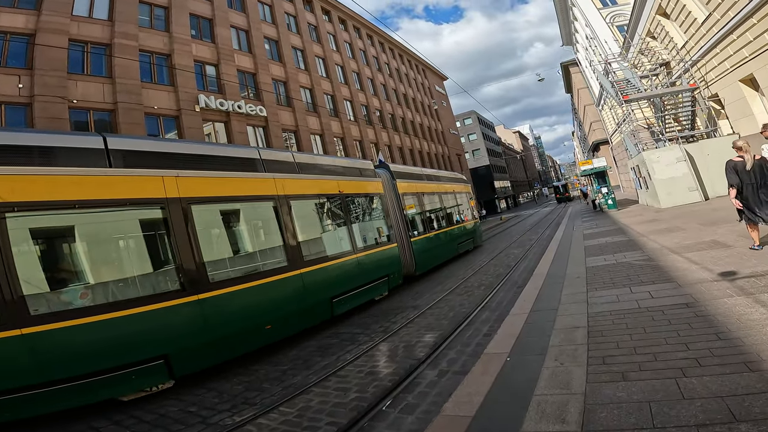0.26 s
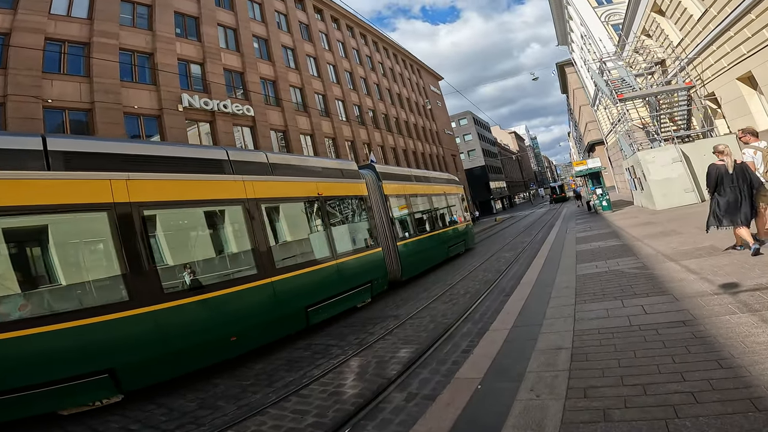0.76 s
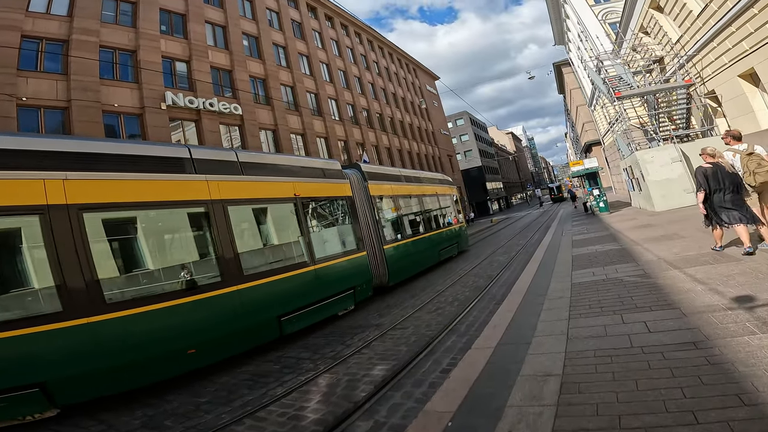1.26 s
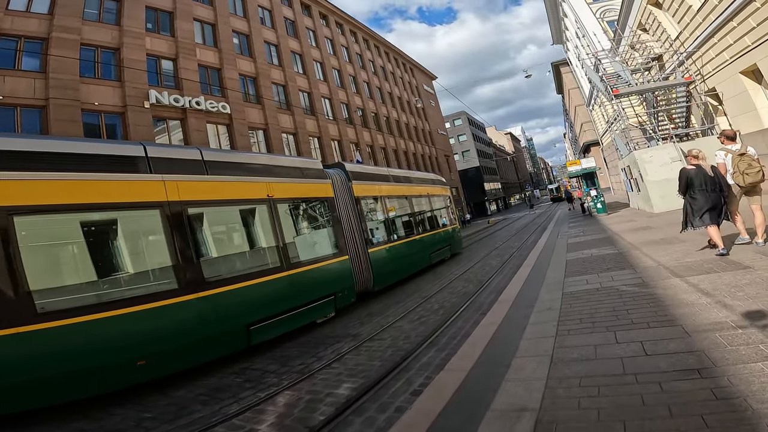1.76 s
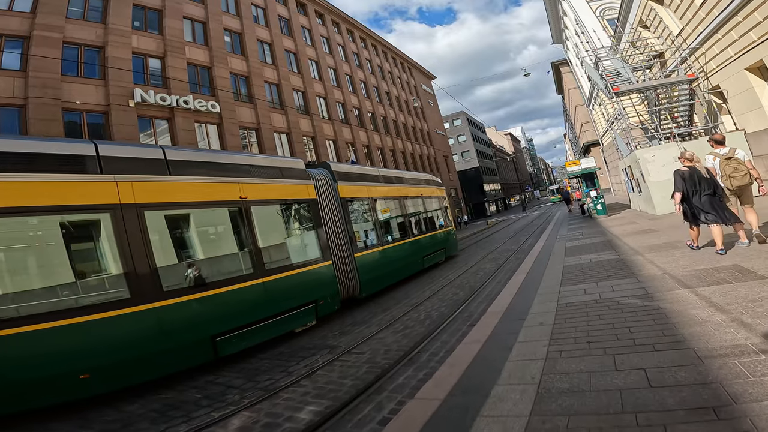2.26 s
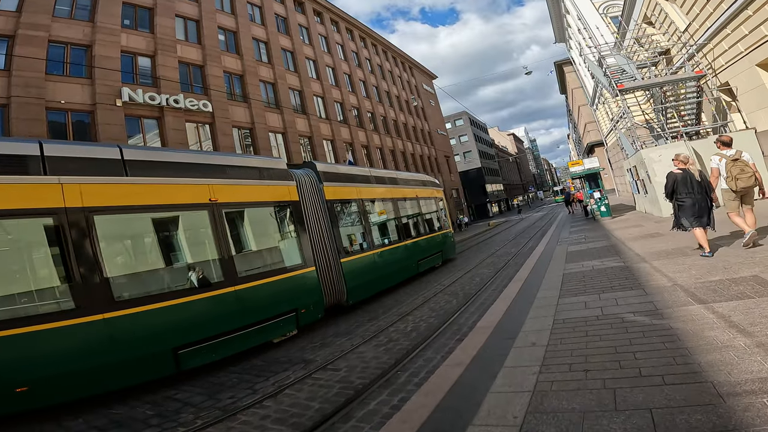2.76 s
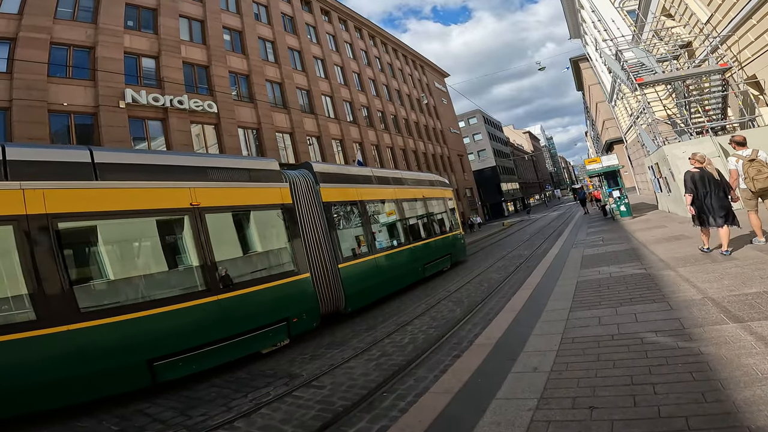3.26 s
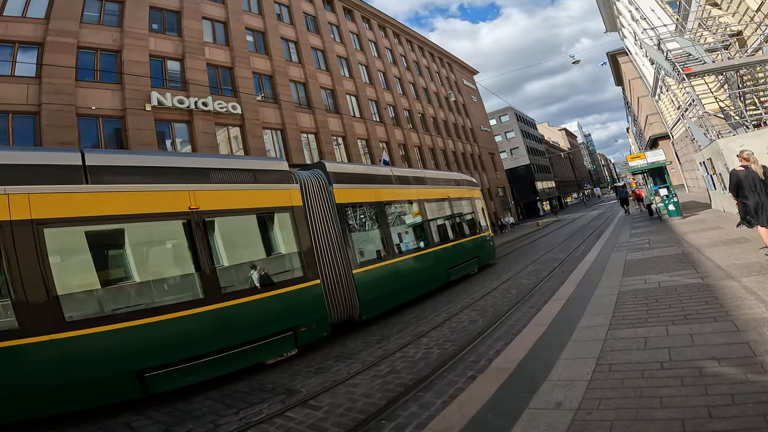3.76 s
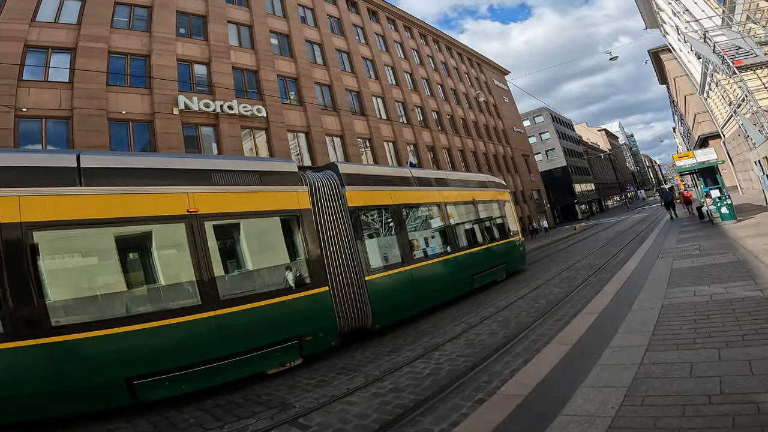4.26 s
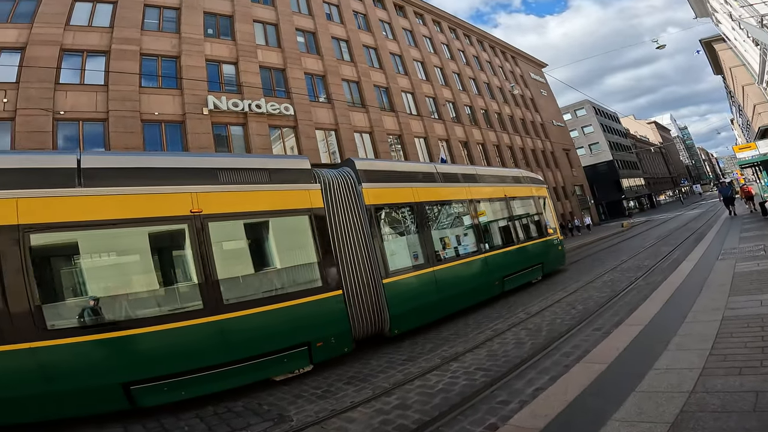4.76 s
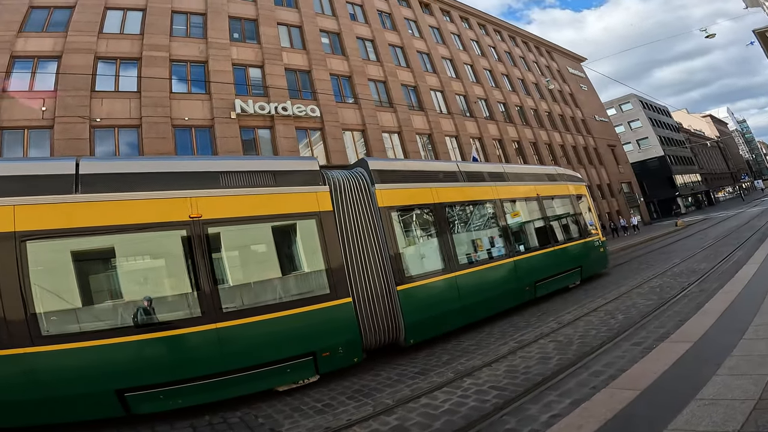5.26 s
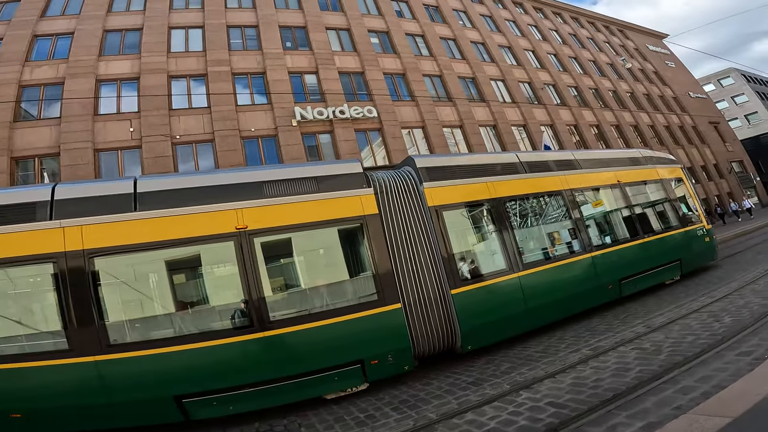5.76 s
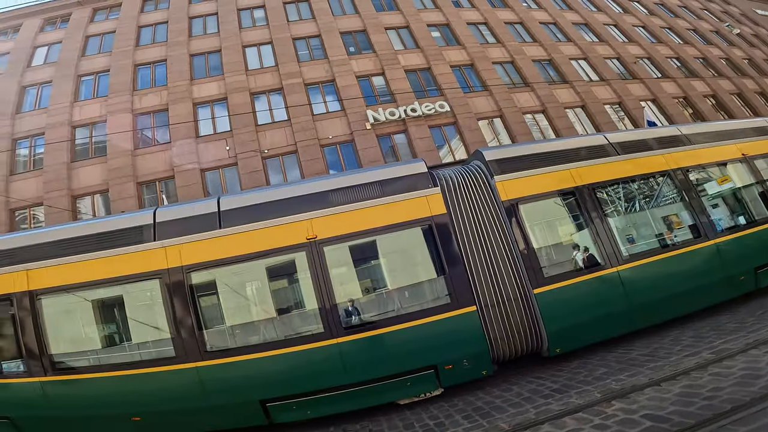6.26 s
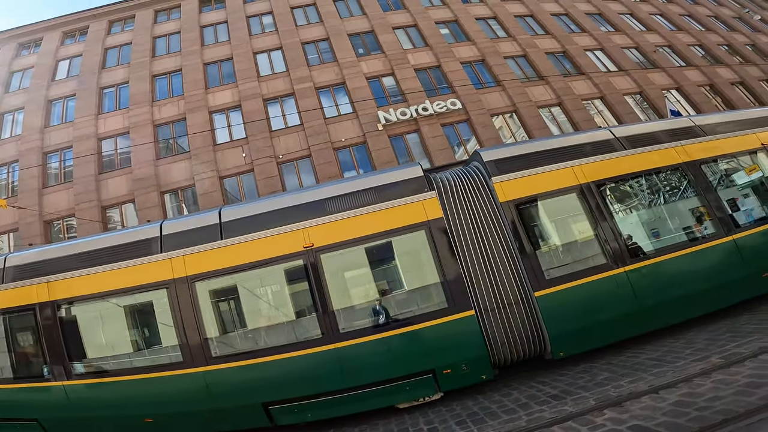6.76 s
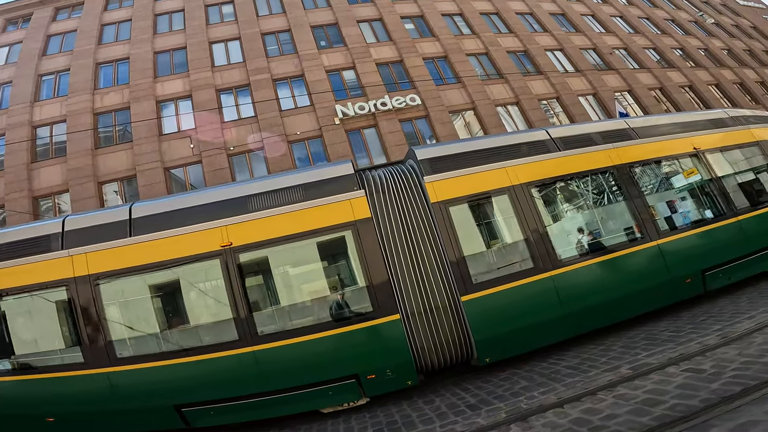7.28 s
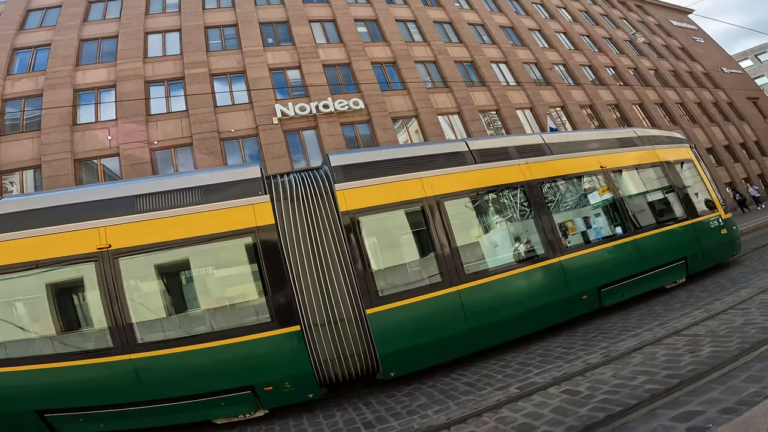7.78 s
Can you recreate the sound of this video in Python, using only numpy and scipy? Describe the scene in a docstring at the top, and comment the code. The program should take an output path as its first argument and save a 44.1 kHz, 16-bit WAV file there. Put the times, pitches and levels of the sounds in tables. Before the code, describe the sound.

Outdoors on a city street, suitcase wheels roll continuously over rough stone, close and dominant. Dull woody knocks come thickly at first, thin out after about six seconds, then return with a sharp burst of handle clacks just past seven. The hollow boom gradually deepens as the pace eases. Light rattling, tiny squeaks and soft stride swishes sit on top; low traffic and a faint high tram whine stay behind, nearly mono.

```python
"""A wheeled suitcase is pulled over brick and cobble paving in a city street, close to a nearly mono microphone.
Filtered random bumps make its hollow boom and rolling rumble; dying tones and noise bursts make the wheel knocks.
Its handle clacks in noise bursts, its fittings rattle, grit snaps and rubbing parts squeak as wavering tones.
Swelling friction noise gives a soft swish at each stride. A tram whines in faint tones over street noise."""
import sys
import numpy as np
from scipy import signal
from scipy.fft import rfft, irfft, next_fast_len
from scipy.io import wavfile

SR = 44100
rng = np.random.default_rng(int(sys.argv[2]) if len(sys.argv) > 2 else 0)


def digitize_waveform(pressure):
    """Quantize a signal to 16-bit integers and store it at the path in sys.argv[1].

    Rows of a 2-D input are taken as channels; values are limited to [-1, 1].
    """
    field = np.atleast_2d(pressure).T
    bounded = np.clip(field, -1, 1)
    quanta = np.round(bounded * 32767).astype(np.int16)
    wavfile.write(sys.argv[1], SR, quanta)


N = 353682
TIME = np.arange(N) / SR  # seconds
HIT_TIME = np.arange(SR // 10) / SR  # the 0.1 s that one hit may last


def undb(db):
    """Turn decibels into gain."""
    return np.exp(np.asarray(db) * (np.log(10) / 20))


def unit(x):
    """Scale to an average (rms) level of 1."""
    return x / np.sqrt(np.mean(x ** 2))


def add(out, start_s, sound):
    """Mix in a short sound from start_s on."""
    first = max(int(start_s * SR), 0)
    out[first:first + len(sound)] += sound[:max(N - first, 0)]


def follow(table):
    """Join the (time_s, value) rows of a table by straight lines."""
    return np.interp(TIME, *np.transpose(table))


def colour(x, points, size=8192):
    """Filter through (pitch_hz, level_db) points without any sound ahead of its cause."""
    hz, db = np.transpose(points)
    bins_hz = np.maximum(np.arange(size // 2 + 1) * SR / size, 1)
    gain = undb(np.interp(np.log(bins_hz), np.log(hz), db))
    # folding the cepstrum of the log gain forward gives the most prompt response
    cepstrum = irfft(np.log(gain))
    cepstrum[1:size // 2] *= 2
    cepstrum[size // 2 + 1:] = 0
    response = irfft(np.exp(rfft(cepstrum)))[:size // 2]
    return signal.oaconvolve(x, response)[:len(x)]


def resonate(x, hz, width_hz):
    """Pass x through one resonance, with gain 1 at its centre."""
    return signal.lfilter(*signal.iirpeak(hz, hz / width_hz, fs=SR), x)


def walk(rate):
    """Wander through random levels, rate of them a second, joined by lines; rms 1."""
    levels = rng.standard_normal(16384)
    return unit(np.interp(TIME * rate, np.arange(len(levels)), levels))


def bumps(rate, spread_db):
    """Make about rate impulses a second at random moments, of random sign and size."""
    hit = np.flatnonzero(rng.random(N) < rate / SR)
    chance = rng.random(N)[hit]
    sign = (-1) ** hit  # odd or even sample
    out = np.zeros(N)
    out[hit] = sign * undb(spread_db * np.sqrt(12) * chance)  # sqrt(12): spread is a standard deviation
    return unit(out)


def swell(length_s):
    """A rounded rise and fall, twice length_s from end to end."""
    return np.exp(-np.linspace(-2, 2, int(2 * length_s * SR)) ** 2)


def ring(hz, decay_s):
    """One struck mode: a tone that dies away exponentially."""
    return np.exp(-HIT_TIME / decay_s) * np.sin(2 * np.pi * hz * HIT_TIME)


def spray(spectrum, rise_s, decay_s, tail_db, tail_s):
    """A hit as quickly dying noise, many tiny contacts with a weak tail; always of the same energy."""
    fade = np.exp(-HIT_TIME / decay_s) + undb(tail_db) * np.exp(-HIT_TIME / tail_s)
    rise = 1 - np.exp(-HIT_TIME / rise_s)
    burst = colour(rng.standard_normal(len(HIT_TIME)) * fade * rise, spectrum)
    return unit(burst) / 12  # peak near 1


# colour of the street noise: pitch_hz [Hz], relative level_db [dB per Hz]
STREET_COLOUR = [(25, -6), (75, 7.5), (125, 11), (200, 4), (700, -5), (1500, -12.5), (3000, -20.5),
                 (5000, -28.5), (6000, -26.5), (7400, -27.5), (8400, -38.5), (10000, -29), (11800, -39.5),
                 (13200, -41), (14500, -59.5)]


def street(level_db, swell_db):
    """Traffic and tram noise between the house fronts: coloured noise, slowly swelling."""
    noise = unit(colour(rng.standard_normal(N), STREET_COLOUR))
    return undb(level_db + swell_db * walk(1.976)) * noise


# how loud the street's deep rumble is: time_s [s], level_db [dB rms]
DEEP_RUMBLE_LEVEL = [(0, -37), (1.15, -36.5), (1.4, -49), (2.2, -51), (2.45, -39), (3.6, -37.5), (4.2, -48),
                     (4.8, -37), (5.8, -50), (6.4, -41.5), (7.0, -57.5), (7.8, -37)]


def deep_rumble(centre_hz, width_hz):
    """The low rumble of tram and traffic: narrow low noise that comes and goes."""
    noise = rng.standard_normal(N)
    for _ in range(2):
        noise = resonate(noise, centre_hz, width_hz)
    return undb(follow(DEEP_RUMBLE_LEVEL)) * unit(noise)


# the tram's electric whine: pitch_hz [Hz], level_db at the start [dB rms before the waver],
# fade_s, by which it has faded 20 dB [s]
WHINE_TONES = [(2955, -62.5, 5), (5908, -73, 6), (6022, -69, 5), (9038, -74, 1.2), (12049, -75, 1)]


def tram_whine(waver_db):
    """Thin, slightly unsteady tones from the drive, fading as the tram rolls on."""
    drift = np.cumsum(1 + 0.0006 * walk(40)) / SR
    waver = waver_db * walk(12)
    out = np.zeros(N)
    for hz, db, fade_s in WHINE_TONES:
        level = np.sqrt(2) * undb(db - 20 * TIME / fade_s + waver)
        out += level * np.sin(2 * np.pi * hz * drift)
    return out


# a swish with each stride: middle_s [s], length_s [s], level_db [dB]
STRIDES = [(.57, 0.207, -60), (1.135, 0.09, -53), (1.74, 0.11, -56.5), (2.401, 0.152, -53.5),
           (2.955, 0.157, -56), (3.536, 0.111, -53.5), (4.16, 0.13, -58.5)]
# colour of cloth and soles brushing: pitch_hz [Hz], relative level_db [dB per Hz]
SWISH_COLOUR = [(1500, -2), (4000, 3.5), (5200, -3.5), (7000, 3.5), (8500, -11.5), (10000, -1.5),
                (11500, -6.5), (13000, -4), (15500, -20)]


def strides():
    """Cloth and soles brush once a step: friction grains that swell, catch and fade over a faint steady brush."""
    brushing = np.zeros(N)
    for middle_s, length_s, db in STRIDES:
        add(brushing, middle_s - length_s, undb(db) * swell(length_s))
    catching = undb(2.93 * walk(70))
    grains = colour(bumps(3500, 3.8), SWISH_COLOUR)
    return (brushing + undb(-66.5)) * unit(catching * grains)


# rubbing parts squeak faintly: middle_s [s], length_s [s], relative level_db [dB], pitch_hz [Hz]
SQUEAKS = [(1.15, 0.039, -55, 6950), (1.70, .04, -56, 7000), (2.84, 0.06, -52, 3730),
           (3.16, .05, -52.5, 3740), (3.54, .08, -55.5, 6850), (4.66, .06, -53.5, 3750),
           (5.15, 0.1, -54.5, 3800), (5.44, 0.095, -55, 3750)]


def squeaks(waver, flutter_db):
    """A contact sticks and slips: a thin tone whose pitch wavers and whose level flutters."""
    out = np.zeros(N)
    bend = 1 + waver * walk(1100)
    flutter = unit(undb(flutter_db * walk(90)))
    for middle_s, length_s, db, hz in SQUEAKS:
        shape = np.zeros(N)
        add(shape, middle_s - length_s, swell(length_s))
        out += undb(db) * shape * flutter * np.sin(2 * np.pi * hz * np.cumsum(bend) / SR)
    return out


# grit snaps under a wheel: start_s [s], rough peak level_db [dB]
SNAPS = [(4.4126, -24), (7.234, -28)]
# colour of snapping grit: pitch_hz [Hz], relative level_db [dB per Hz]
GRIT_COLOUR = [(1000, -4), (2000, 0), (4000, -9), (6500, -3), (8700, -1), (11300, -7), (13000, 1.5),
               (14300, -12)]


def snaps(crumbs_db, crumbs_s):
    """Grit cracks away from under a wheel in a noise burst, and its crumbs scatter as dying ticks."""
    out, scatter = np.zeros(N), np.zeros(N)
    for start_s, db in SNAPS:
        crack = spray(GRIT_COLOUR, rise_s=0.0014, decay_s=0.0013, tail_db=-30, tail_s=0.018)
        add(out, start_s, undb(db) * crack)
        add(scatter, start_s, undb(db + crumbs_db) * np.exp(-HIT_TIME / crumbs_s))
    return out + scatter * unit(colour(bumps(900, 4), GRIT_COLOUR))


# the handle clacks in its tubes: start_s [s], relative level_db [dB], pitch_hz of the ringing [Hz]
CLACKS = [(1.0384, -30.5, 3000), (1.646, -29, 2900), (2.071, -34, 2330), (2.459, -33, 2000),
          (2.762, -32, 3450), (2.8943, -31.5, 2900), (2.959, -33, 2070), (2.9806, -28.5, 3000),
          (3.0355, -32, 3700), (3.168, -33, 3700), (3.8172, -31, 3360), (3.8496, -31, 3200),
          (3.901, -33, 3150), (4.19, -32, 2980), (4.6214, -34, 3650), (4.8801, -29.5, 3700),
          (5.0234, -31.5, 3660), (5.189, -30.5, 3790), (5.2116, -30.5, 3840), (5.249, -37, 2000),
          (5.271, -36, 2030), (5.543, -36, 1980), (6.968, -33, 2000), (6.995, -34.5, 2090),
          (7.0335, -37, 1650), (7.0465, -35.5, 2010), (7.1606, -34, 1920), (7.1832, -28.5, 1960),
          (7.2055, -36, 2100), (7.2904, -23.5, 1970), (7.3121, -26, 2040), (7.347, -31.5, 2050),
          (7.380, -37, 1920), (7.733, -32, 3760), (7.8865, -31, 3234), (7.9084, -32, 3066)]
# colour of the handle's crack: pitch_hz [Hz], relative level_db [dB per Hz]
HANDLE_COLOUR = [(400, -10), (1200, 1.5), (2000, 1), (2600, -3.5), (3600, -1.5), (4800, -13.5),
                 (8000, -26.5), (16000, -46)]


def clacks(ring_db, ring_s, bounce_s, bounce_db):
    """The loose handle hits its tubes and bounces once; the tubes ring briefly."""
    out = np.zeros(N)
    for start_s, db, hz in CLACKS:
        bounce = (bounce_s * (.5 + rng.random()), bounce_db)
        for late_s, drop_db in ((0, 0), bounce):
            crack = spray(HANDLE_COLOUR, rise_s=0.0013, decay_s=0.0023, tail_db=-19, tail_s=.018)
            tube = np.e * HIT_TIME / ring_s * ring(hz, ring_s)
            add(out, start_s + late_s, undb(db + drop_db) * (crack + undb(ring_db) * tube))
    return out


# colour of the loose fittings: pitch_hz [Hz], relative level_db [dB per Hz]
FITTINGS_COLOUR = [(500, -11), (1200, 2), (1700, -2), (2100, 0.5), (2500, -4), (3000, -2), (3400, -7.5),
                   (3750, -4), (4200, -12), (5200, -13.5), (7000, -17.5), (12000, -30), (15000, -49.5)]


def ticks(rate, spread_db):
    """Loose fittings tap one at a time: small dry ticks from filtered impulses."""
    return unit(colour(bumps(rate, spread_db), FITTINGS_COLOUR))


# colour of the rolling wheels: pitch_hz [Hz], relative level_db [dB per Hz]
WHEELS_COLOUR = [(30, -23.5), (75, -6), (135, 0), (200, -6), (290, -4.5), (380, 2), (420, -2.5), (570, 0),
                 (700, -1.5), (900, -11), (1300, -19.5), (2200, -31), (5000, -51.5), (16000, -85.5)]


def rolling(rate, spread_db, texture_db, chatter_s, scrape_db):
    """Stone edges jolt the wheels over a fine rough texture; each jolt sets the fittings chattering."""
    jolts = bumps(rate, spread_db)
    texture = undb(texture_db) * bumps(2500, 2.8)
    rumble = colour(jolts + texture, WHEELS_COLOUR)
    # each jolt leaves a shaking that dies away over chatter_s
    shaking = unit(signal.lfilter([1], [1, -np.exp(-1 / (chatter_s * SR))], np.abs(jolts)))
    chatter = (shaking + undb(scrape_db)) * rng.standard_normal(N)
    rattle = colour(chatter, FITTINGS_COLOUR)
    return unit(rumble), unit(rattle)


# how coarse the paving is under the wheels: time_s [s], level_db [dB]
PAVING = [(0, -0.5), (.4, -2), (.55, .5), (1.2, 0), (2.2, 0.5), (3.0, 2), (3.9, 0), (4.55, -2.5), (4.75, 0),
          (5.9, 1), (6.85, -4.5), (7.2, -1.5), (8.0, -2)]
# the wheels cross a patch of uneven stones: middle_s [s], extra shaking level_db [dB]
PATCHES = [(.48, 3.5), (.73, 1.5), (1.75, 3.5), (3.87, 3.5), (4.14, 5.5), (4.39, 4.5), (4.68, 5),
           (4.79, 3.5), (4.92, 1.5), (7.26, 4), (7.88, 3.5)]


def shaking_db(s):
    """How hard the ground shakes wheels and fittings at time s: the paving plus its uneven patches."""
    patch_s = 0.041  # from the middle of a patch to its edge
    level_db = np.interp(s, *np.transpose(PAVING))
    for middle_s, db in PATCHES:
        level_db = level_db + db * np.exp(-((s - middle_s) / patch_s) ** 2)
    return level_db


# a wheel drops into a paving joint; small sharp edges give the high pitches:
# start_s [s], relative level_db [dB], pitch_hz [Hz]
KNOCKS = [(0.153, -18, 567), (0.302, -17.5, 494), (0.359, -18.5, 527), (0.585, -13.5, 570),
          (0.658, -27.5, 1040), (0.724, -24.5, 930), (0.736, -16.5, 541), (0.846, -16, 556),
          (0.981, -14, 617), (1.113, -13, 533), (1.251, -16.5, 591), (1.352, -18.5, 652), (1.397, -17, 550),
          (1.525, -21, 516), (1.539, -20, 560), (1.568, -21, 560), (1.837, -20.5, 527), (2.07, -22, 640),
          (2.141, -20, 624), (2.34, -28, 1080), (2.381, -17.5, 573), (2.463, -18, 549), (2.514, -23, 568),
          (2.679, -21, 592), (2.79, -21, 600), (2.817, -27, 1050), (2.854, -23, 673), (2.927, -18.5, 594),
          (2.958, -17.5, 525), (3.005, -20, 627), (3.04, -19.5, 574), (3.065, -23, 750), (3.169, -27, 1090),
          (3.196, -20, 670), (3.311, -22, 560), (3.334, -19.5, 547), (3.469, -18.5, 531), (3.501, -21, 554),
          (3.6, -19, 563), (3.683, -15.5, 538), (3.733, -14, 549), (3.866, -16, 530), (3.98, -18.5, 657),
          (4.123, -22, 557), (4.36, -17, 560), (4.394, -26, 1074), (4.671, -19, 587), (4.686, -19.5, 600),
          (4.783, -26.5, 1170), (4.914, -26, 1000), (5.064, -19, 560), (5.195, -19.5, 457),
          (5.216, -13, 550), (5.366, -20.5, 736), (5.543, -23, 620), (5.651, -18, 650), (5.783, -19, 732),
          (5.929, -17, 506), (5.931, -28.5, 1144), (6.09, -15, 564), (6.426, -21, 560), (7.291, -21, 666),
          (7.427, -21, 571), (7.431, -29.5, 1020), (7.607, -17, 580), (7.702, -17.5, 472),
          (7.811, -22.5, 655.5), (7.862, -20.5, 565), (7.94, -16, 570)]
# colour of the axle's dull crack: pitch_hz [Hz], relative level_db [dB per Hz]
AXLE_COLOUR = [(300, -13.5), (900, 2.5), (1400, -5), (3000, -22), (7000, -38.5), (16000, -67)]


def knocks(rise_cycles, uneven_db, overtone, overtone_db, thud_hz, thud_s, thud_db, crack_db):
    """A wheel hits a joint's far edge, no two alike: a tone and woody overtone swell and die, with thud and crack."""
    out = np.zeros(N)
    for start_s, db, hz in KNOCKS:
        length, hardness = undb(uneven_db * rng.standard_normal(2))
        rise_s = length * rise_cycles / hz
        modes = ring(hz, rise_s) + hardness * undb(overtone_db) * ring(overtone * hz, rise_s)
        knock = np.e * HIT_TIME / rise_s * modes
        thud = undb(thud_db) * ring(thud_hz, thud_s)  # the hollow case
        crack = spray(AXLE_COLOUR, rise_s=0.00124, decay_s=0.0042, tail_db=-17.5, tail_s=0.0125)
        add(out, start_s, undb(db) * (knock + thud + hardness * undb(crack_db) * crack))
    return out


# the quicker the pace, the higher the band that the stones shake: time_s [s], pitch_hz [Hz]
PACE = [(0, 286), (1.2, 282), (2.1, 238), (2.9, 245.8), (3.6, 224), (4.8, 224), (5.8, 208.3), (6.6, 190),
        (8, 182)]
# resonances of the hollow case: pitch_hz [Hz], width_hz [Hz], relative level_db [dB]
CASE_MODES = [(135.6, 38.2, -0.5), (171.5, 21.3, 3), (194.7, 23.8, 2.5), (227.5, 29.75, -1),
              (268.2, 47, -.5), (315.7, 50.4, -2.5), (372.5, 35.6, -1.5)]


def case_boom(rate, spread_db, focus_db):
    """The stones shake the hollow case; the modes nearest to the pace take most of the energy."""
    pace_hz = follow(PACE)
    shake, out, power = bumps(rate, spread_db), 0, 0
    for k, (hz, width_hz, db) in enumerate(CASE_MODES):
        # each panel is shaken at its own moments
        panel_shake = np.roll(shake, k * SR)
        mode = resonate(resonate(panel_shake, hz, width_hz), hz, 3 * width_hz)
        gain = undb(db - focus_db * np.log2(hz / pace_hz) ** 2)
        out = out + gain * mode
        power = power + gain ** 2 * width_hz
    return unit(out / np.sqrt(power))  # the changing pace moves the pitch, hardly the level


def suitcase():
    """The hollow case booms, the wheels rumble and knock, and its loose parts rattle, clack and squeak."""
    rumble, rattle = rolling(rate=140, spread_db=2.3, texture_db=-2.2, chatter_s=0.006, scrape_db=-1.0)
    # the rumble gains 3 dB for each octave that the pace band lies above 229 Hz
    pace_db = 3 * np.log2(follow(PACE) / 229)
    shaken = undb(-31.5 + pace_db) * rumble + undb(-51) * rattle
    shaken += undb(-56) * ticks(rate=70, spread_db=2.0)
    out = undb(-25) * case_boom(rate=600, spread_db=2, focus_db=16.5)
    out += undb(shaking_db(TIME)) * shaken
    out += undb(0.64) * knocks(rise_cycles=1.0, uneven_db=1.2, overtone=1.65, overtone_db=-17,
                               thud_hz=257.6, thud_s=0.0069, thud_db=-12.0, crack_db=-14)
    out += undb(-.5) * clacks(ring_db=-11, ring_s=.002, bounce_s=.007, bounce_db=-11)
    out += snaps(crumbs_db=-26, crumbs_s=0.015)
    out += undb(-1) * squeaks(waver=.035, flutter_db=6.5)
    return out


# the two microphone ports differ in colour: pitch_hz [Hz], left minus right level_db [dB]
PORTS = [(60, 0.75), (500, 0.61), (1300, 0), (7000, 0), (10500, .5), (13000, 9.5), (15500, 9.5)]


def ports(x):
    """One sound reaches both microphone ports at once, each with its own colour."""
    size = next_fast_len(N, real=True)
    bins_hz = np.arange(size // 2 + 1) * SR / size
    lean_db = np.interp(bins_hz, *np.transpose(PORTS))
    gains = undb(np.array([lean_db, -lean_db]) / 2)
    return irfft(rfft(x, size) * gains, size)[:, :N]


def scene():
    """The street and the tram, the walker's strides and the suitcase close by."""
    around = street(level_db=-38, swell_db=0.85) + deep_rumble(centre_hz=100.5, width_hz=84)
    around += tram_whine(waver_db=2.5)
    return ports(around + strides() + suitcase())


def record(dry):
    """Each microphone adds a trace of its own top-end hiss; the very top is cut."""
    hiss_band = signal.butter(8, [9500, 13400], "band", fs=SR, output="sos")
    hiss = signal.sosfilt(hiss_band, rng.standard_normal((2, N)))
    top_cut = signal.ellip(8, .2, 70, 15600, fs=SR, output="sos")  # low-pass at 15600 Hz
    return signal.sosfilt(top_cut, dry + undb(-66.0) * hiss)


dry = scene()
out = record(dry)
digitize_waveform(out)
```